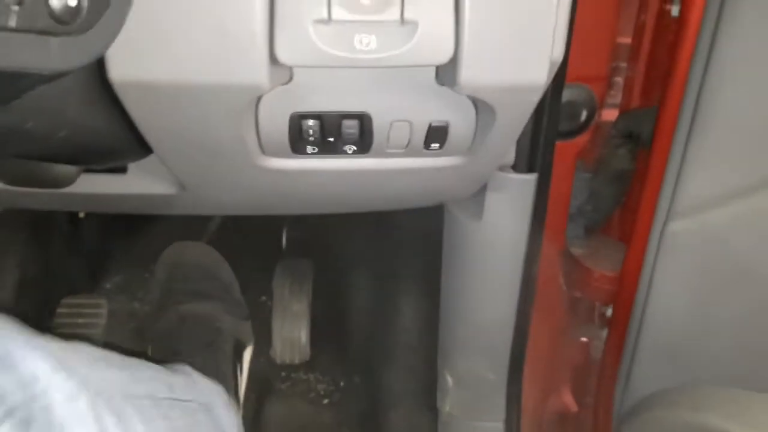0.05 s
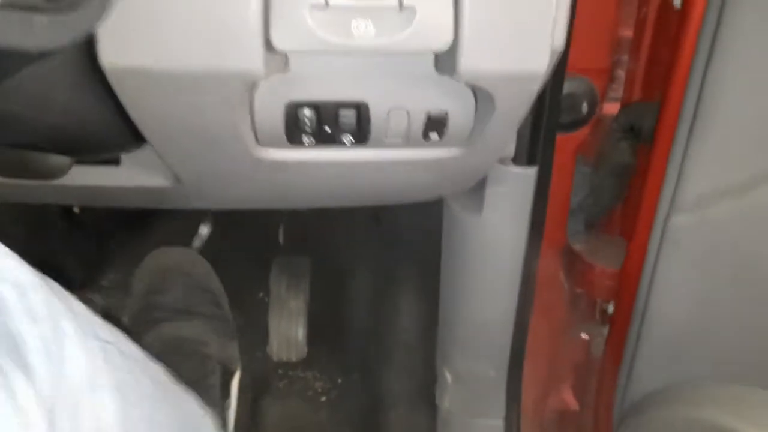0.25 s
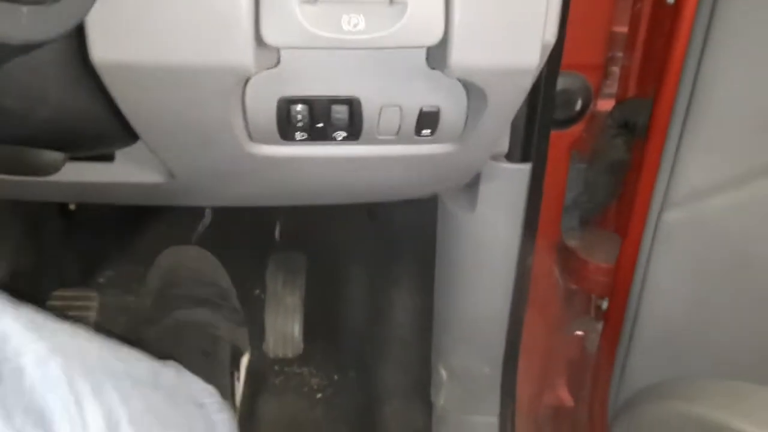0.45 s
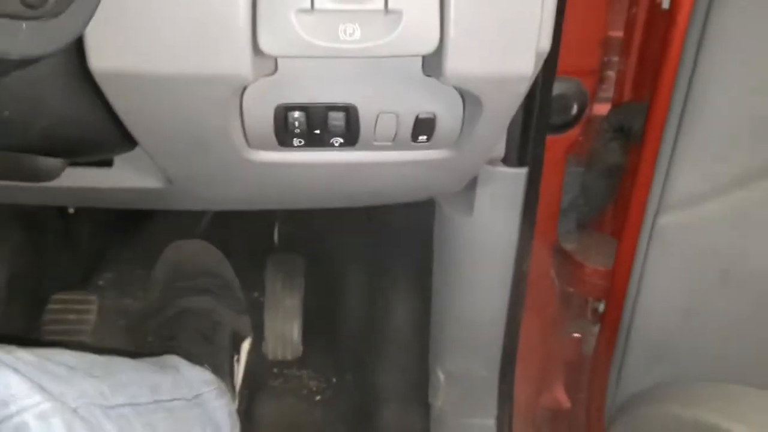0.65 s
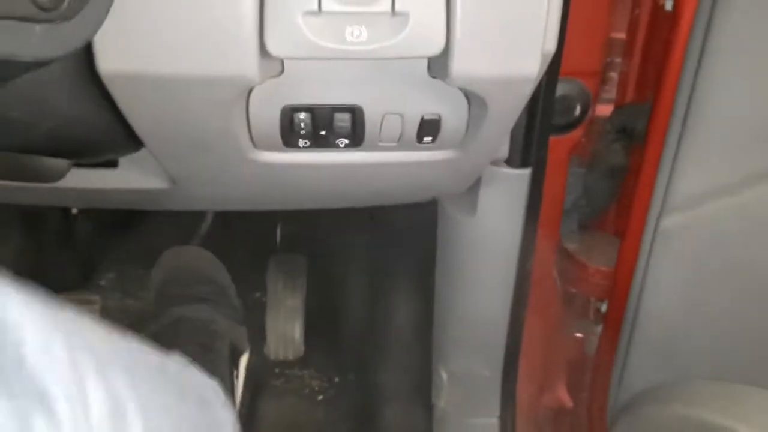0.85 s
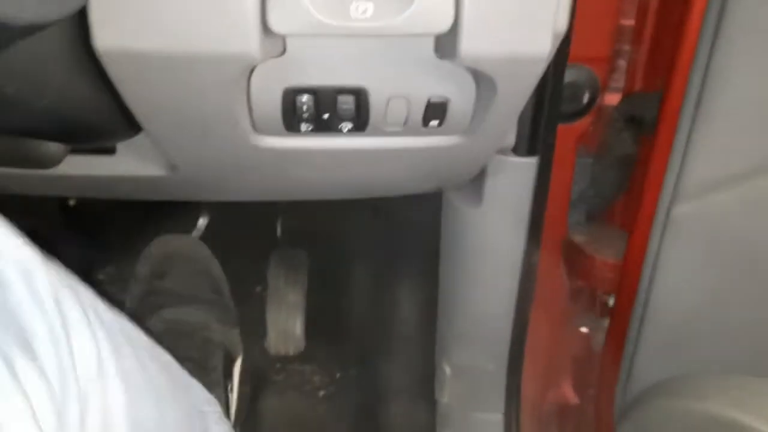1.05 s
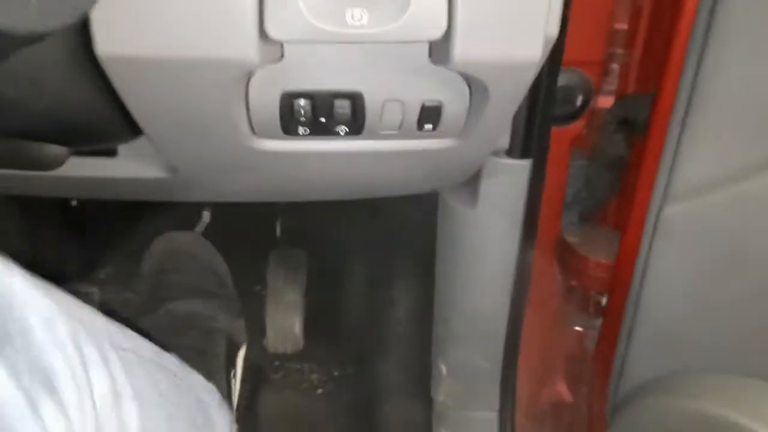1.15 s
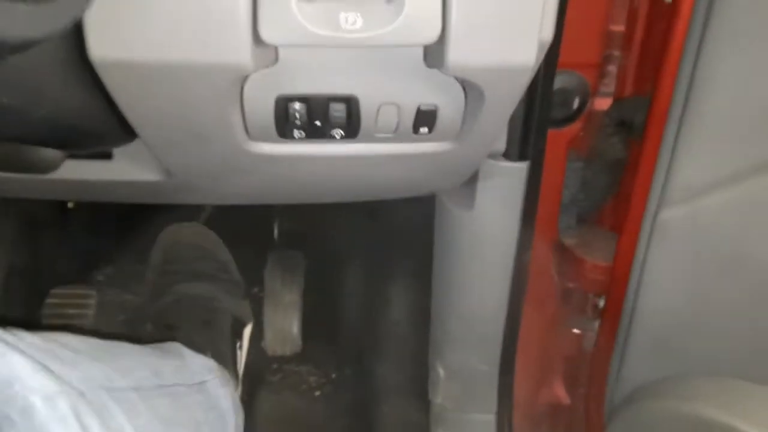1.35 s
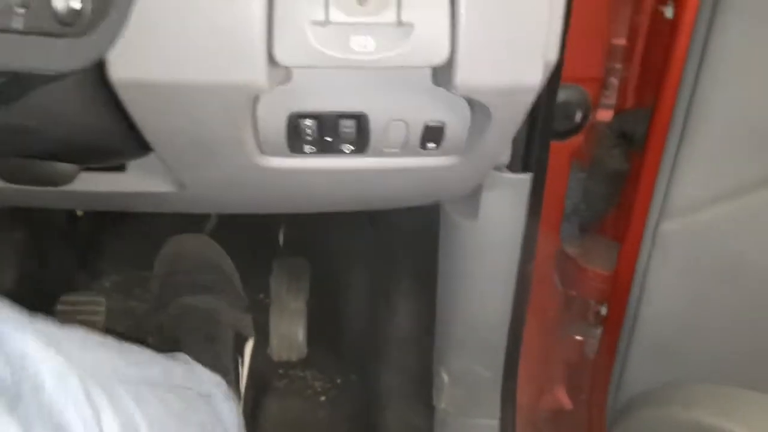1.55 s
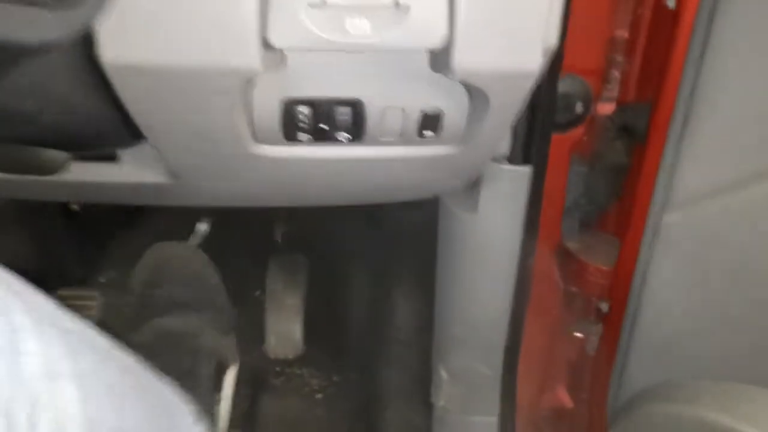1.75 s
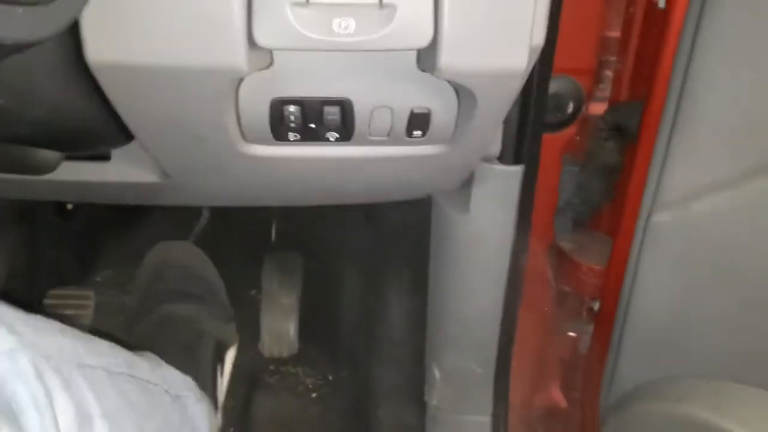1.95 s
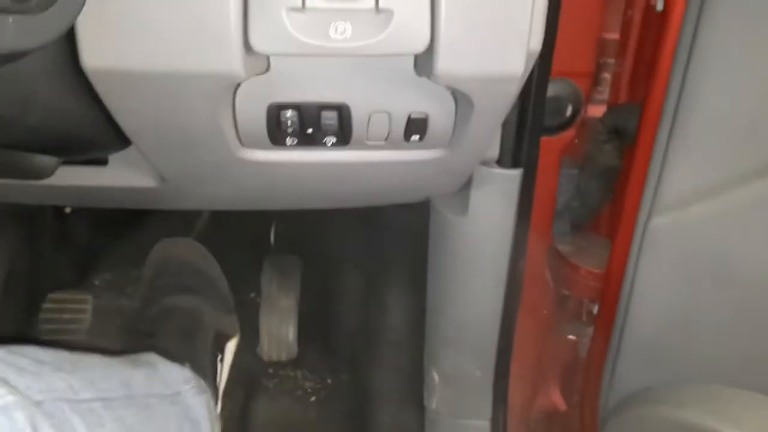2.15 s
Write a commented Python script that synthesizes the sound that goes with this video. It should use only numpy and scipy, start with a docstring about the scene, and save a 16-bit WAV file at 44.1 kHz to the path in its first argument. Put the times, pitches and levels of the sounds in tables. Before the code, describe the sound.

A car brake pedal is pumped three times by foot. From 0.14 to 0.42 seconds, the strongest stroke gives tumbling dull thuds, sharp clacks, panel rattle and a brief spring groan. A softer stroke follows at 0.86-1.16, with tiny clicks near 1.35, then a third at 1.6-1.9. Airy cloth hiss swells with the strokes; faint garage air dips almost to silence between them. Close, dry stereo cabin sound.

```python
"""A car pedal pumped three times by foot, heard from the driver's seat with the door open.
Each stroke jolts the pedal box, floor pan and cabin into dull thuds: damped modes struck by blows and judder.
Trim panels ring along, the return spring groans in wavering tones, linkage and switch tick in noise bursts,
small parts clack in short damped tones. Noise of air and cloth hisses with each stroke over garage air;
between the strokes the background dips almost to silence."""
import sys
import numpy as np
from scipy import signal
from scipy.fft import rfft, irfft
from scipy.io import wavfile
from scipy.ndimage import uniform_filter1d

SR = 44100
rng = np.random.default_rng(int(sys.argv[2]) if len(sys.argv) > 2 else 0)


def volts_from_decibels(level):
    """Turn decibel levels (scalar or array-like) into linear amplitude factors."""
    exponent = np.asarray(level, float) / 20
    return 10 ** exponent


def dump(signal):
    """Clip the signal to [-1, 1] and save it as 16-bit WAV at the path in sys.argv[1]."""
    limited = np.clip(np.atleast_2d(signal).T, -1, 1)
    pcm = np.round(limited * 32767).astype(np.int16)
    wavfile.write(sys.argv[1], SR, pcm)


N = 97020  # 2.2 s


def evened(x):
    """Scales a signal to an rms of 1."""
    return x / np.sqrt(np.mean(x ** 2) + 1e-20)


def read(points, hz):
    """Reads a curve of (Hz, value) points along a log frequency axis."""
    point_hz, value = np.transpose(points)
    return np.interp(np.log(hz + 1), np.log(point_hz + 1), value)


def add(mix, start_s, sound):
    """Lays a sound into the mix from start_s, cut off at the end of the mix."""
    part = mix[..., round(start_s * SR):][..., :sound.shape[-1]]
    part += sound[..., :part.shape[-1]]


def coloured(x, points):
    """Shapes the spectrum by (Hz, dB) points."""
    gain = volts_from_decibels(read(points, np.fft.rfftfreq(x.shape[-1], 1 / SR)))
    return irfft(rfft(x) * gain, x.shape[-1])


# levels over time, of the judder of the moving pedal, and of the background hiss and air with its dips:
# start_s, judder_db, background_db
LEVELS = [(0, -75, -69.5), (.1, -85, -66.5), (.16, -46, -60), (.36, -28, -47), (.46, -53.5, -59),
          (.6, -64, -68.5), (.68, -74.5, -79), (.73, -86, -75.5), (.75, -64.5, -69.5),
          (0.821, -64.5, -64.5), (.9, -40, -58.5), (1.08, -31.5, -59), (1.25, -53, -63), (1.38, -82.5, -65),
          (1.44, -73.5, -76), (1.5, -55.5, -70.5), (1.57, -78, -65.5), (1.66, -37, -58.5),
          (1.86, -42, -52.5), (1.93, -50, -61.5), (2.051, -68.5, -61.5), (2.13, -71, -72),
          (2.2, -84.5, -79.5)]


def level_over_time_db(column):
    """Draws one column of the levels table as a line over time."""
    points = np.transpose(LEVELS)
    return np.interp(np.arange(N) / SR, points[0], points[column])


# colour of the air and cloth noise: pitch_hz, level_db (per Hz, relative)
HISS_COLOUR = [(290, -24.5), (560, -8.5), (1970, -11.5), (4800, -8), (8300, -12.5), (9400, -27),
               (12500, -13.5), (16300, -31.5)]


def hiss():
    """Air and cloth noise, nearly independent at the two ports, swells with each stroke."""
    slow = evened(uniform_filter1d(rng.standard_normal(N), 500))
    flutter_db = 0.34 * slow
    noise = rng.standard_normal((3, N))
    ports = noise[:2] + 0.083 * noise[2]  # the third noise is common to both ports
    return evened(coloured(ports, HISS_COLOUR)) * volts_from_decibels(level_over_time_db(2) + flutter_db)


# colour of the garage air: pitch_hz, level_db (per Hz, relative)
AIR_COLOUR = [(15, -34), (25, -5), (76, -0.5), (202, -17), (1080, -28), (1350, -44), (3030, -45.5),
              (6480, -31), (16300, -43.5)]
AIR_DB, AIR_FULL_DB = -62.5, -72  # full level; background level below which the air sinks with it


def garage_air():
    """Steady noise, mostly common to both ports, that sinks in the dips of the background."""
    noise = rng.standard_normal((3, N))
    ports = noise[:2] + 3 * noise[2]
    sink_db = np.minimum(level_over_time_db(2) - AIR_FULL_DB, 0)
    return evened(coloured(ports, AIR_COLOUR)) * volts_from_decibels(AIR_DB + sink_db)


# modes of the pedal box, floor pan, cabin boom and trim panels, each: pitch_hz, level_db, t60_s
BOX = [(308.7, -2.5, 0.099), (328.8, 7.5, 0.059), (369.6, -12.5, 0.12)]
PAN = [(121.85, 1.5, 0.17), (151.8, 7, 0.1), (172, -6.5, 0.1)]
BOOM = [(57, -6, 0.25), (77.35, 2.5, .16), (100.2, 6, 0.11)]
TRIM = [(463.1, -2, 0.17), (540.3, 3, 0.082), (614, -5, 0.082), (696.2, -5.5, 0.13), (838, -8, 0.19),
        (982, -10, 0.12), (1061, -13.5, 0.09), (1181, -10.5, 0.15), (1322, -11, 0.13), (1468, -17.5, 0.21),
        (1763, -15.5, 0.064), (2040, -10.5, 0.14)]
# how softly each part starts, in the order box, pan, boom, trim: rise_s
RISE_S = [0.0083, 0.0057, 0.0067, 0.002]
# share of the judder in each part, same order: level_db
JUDDER_DB = [-21, -20, -16, -27]
JUDDER_PER_S, JUDDER_SPREAD_DB = 150, 7.5  # mean rate of blows, scale of their random extra level


def ring(modes, rise_s):
    """Response of one part to a soft blow: a sum of damped sines with a peak of 1."""
    t = np.arange(SR // 2) / SR
    x = sum(volts_from_decibels(db - 60 * t / t60) * np.sin(2 * np.pi * hz * t) for hz, db, t60 in modes)
    x = x * (1 - np.exp(-t / rise_s)) ** 2
    return x / abs(x).max()


def judder():
    """Random small blows, stronger as the pedal moves, set the modes of all four parts ringing."""
    out = np.zeros(N)
    level = volts_from_decibels(level_over_time_db(1))
    for modes, rise_s, share_db in zip([BOX, PAN, BOOM, TRIM], RISE_S, JUDDER_DB):
        extra_db = JUDDER_SPREAD_DB * np.minimum(rng.exponential(1, N), 3)
        size = volts_from_decibels(extra_db) * rng.choice([-1, 1], N)
        hits = rng.random(N) < JUDDER_PER_S / SR
        drive = size * hits * level * volts_from_decibels(share_db)
        out += signal.fftconvolve(drive, ring(modes, rise_s))[:N]
    return out


# jolts of the pedal, and one faint late rustle: start_s, box_db, pan_db, boom_db, trim_db
BLOWS = [(0.004, -53.5, -55, -76, -85), (0.136, -34.5, -44, -37.5, -61), (0.164, -42, -25, -53, -44.5),
         (0.2, -17.5, -35, -15, -32.5), (0.208, -25, -14, -17, -32), (0.238, -21, -34, -57.5, -35.5),
         (0.27, -39, -26.5, -47, -39.5), (0.307, -21, -46, -31, -33), (0.319, -16, -13.5, -27, -28.5),
         (0.337, -16, -18.5, -18, -30), (0.359, -29.5, -24, -17, -47), (0.387, -44, -29, -25.5, -47.5),
         (0.423, -47, -38, -52, -48.5), (0.487, -64, -54.5, -36, -82), (0.739, -54, -54, -66.5, -83.5),
         (0.864, -44, -37.5, -63.5, -54.5), (0.886, -28, -26.5, -53, -46.5), (0.907, -64, -33.5, -46, -64),
         (0.934, -19.5, -17.5, -49, -36.5), (0.955, -27.5, -47, -44, -38.5), (0.97, -42, -58, -30.5, -49),
         (1.003, -30, -25, -27.5, -39), (1.032, -25.5, -33, -28, -48), (1.057, -30.5, -25, -33, -67),
         (1.089, -21.5, -20, -35.5, -34), (1.115, -71, -45, -23.5, -52), (1.143, -71, -34, -42, -50),
         (1.16, -39.5, -37.5, -33, -46.5), (1.331, -58, -76, -62, -55.5), (1.469, -60, -48, -55, -82),
         (1.564, -65.5, -52, -54, -82), (1.614, -35, -48, -36, -56), (1.639, -46, -28, -39, -50),
         (1.663, -35, -25.5, -70, -56), (1.69, -25.5, -23.5, -39, -38.5), (1.7, -20, -16.5, -40, -32.5),
         (1.719, -27.5, -21.5, -38, -37), (1.756, -30.5, -33, -28, -46), (1.788, -42, -17.5, -19.5, -47.5),
         (1.8157, -17, -26, -17.5, -31.5), (1.843, -36, -23, -25, -41), (1.872, -39, -31, -46, -49.5),
         (1.912, -53, -43, -41, -63), (1.945, -52, -63, -35, -74), (2.059, -64, -76, -63, -59.5)]


def thuds():
    """Single blows strike the pedal box, floor pan and cabin, which answer with their low modes."""
    out = np.zeros(N)
    for part, modes in enumerate([BOX, PAN, BOOM]):
        drive = np.zeros(N)
        for blow in BLOWS:
            drive[round(blow[0] * SR)] += volts_from_decibels(blow[1 + part])
        out += signal.fftconvolve(drive, ring(modes, RISE_S[part]))[:N]
    return out


TRIM_SCATTER_DB, TRIM_SHIFT = 2, 0.0629  # scatter of level, and of pitch as a share
TRIM_APART_RAD = 0.45  # scatter of the phase turned forward at one port and back at the other


def panels():
    """Every blow sets the trim modes ringing with its own levels, pitches and phases."""
    out, t = np.zeros((2, N)), np.arange(6000) / SR
    hz, db, t60 = np.transpose(TRIM * 5)[:, :, None]  # each mode is a cluster of five
    cluster_gain = np.sqrt(len(TRIM) / len(hz))
    rise = (1 - np.exp(-t / RISE_S[3])) ** 2
    for blow in BLOWS:
        level_z, pitch_z, phase_z, apart_z = rng.standard_normal((4, len(hz), 1))
        level_db = blow[4] + db + TRIM_SCATTER_DB * level_z
        fade = cluster_gain * volts_from_decibels(level_db - 60 * t / t60) * rise
        turn = 2 * np.pi * (hz * (1 + TRIM_SHIFT * pitch_z) * t + phase_z)
        apart = TRIM_APART_RAD * apart_z
        left = (fade * np.sin(turn + apart)).sum(0)
        right = (fade * np.sin(turn - apart)).sum(0)
        add(out, blow[0], np.array([left, right]))
    return out


# the return spring groans as it is loaded and released: start_s, length_s, pitch_hz, level_db
GROANS = [(0.106, 0.13, 326.4, -35), (0.438, 0.23, 275.3, -61), (0.826, 0.087, 335.5, -45),
          (1.171, 0.28, 250.3, -66.5), (1.574, 0.15, 322.2, -38.5), (1.987, 0.12, 268.5, -57.5)]
GROAN_WOBBLE, GROAN_FLUTTER_DB = 0.03, 3  # rms pitch waver as a share, rms level waver
GROAN_OCTAVE_DB, GROAN_SWELL = -24.5, 1.32  # octave under the tone's level, exponent of the arch


def groans():
    """A wavering tone with a weak octave under one arch per groan."""
    out = np.zeros(N)
    noise = rng.standard_normal((2, N))
    slow = evened(uniform_filter1d(uniform_filter1d(noise, 300), 300))
    for start_s, length_s, hz, db in GROANS:
        level_waver, pitch_waver = slow[:, round(start_s * SR):][:, :round(length_s * SR)]
        progress = np.linspace(0, 1, len(level_waver))
        arch = np.sin(np.pi * progress ** 0.92).clip(0) ** GROAN_SWELL
        turn = 2 * np.pi * np.cumsum(hz * (1 + GROAN_WOBBLE * pitch_waver)) / SR
        tone = np.sin(turn) + volts_from_decibels(GROAN_OCTAVE_DB) * np.sin(2 * turn)
        add(out, start_s, arch * volts_from_decibels(db + GROAN_FLUTTER_DB * level_waver) * tone)
    return out


# ticks of linkage and switch: start_s, level_db, centre_hz, low_db (lows' lift), high_db (highs' lift)
TICKS = [(0.138, -41.5, 4150, -18, -15), (0.157, -33.5, 4300, -13.5, -15.5), (0.2022, -24, 5730, -5, -7.5),
         (0.2391, -31.5, 4300, 0.5, -2), (0.308, -23.5, 2930, -3.5, -38.5), (0.338, -26, 4090, 5, -49),
         (0.3877, -36, 3900, 0, -12), (0.865, -41.5, 4300, -8, -15), (0.8832, -34, 4400, -10, -13.5),
         (0.9334, -36, 4160, 9.5, -20), (0.9423, -32, 6160, 5, -4), (0.9752, -31.5, 6460, 4, -18.5),
         (1.044, -40.5, 4180, 7.5, -48), (1.0909, -33, 2300, 5.5, -52), (1.1593, -39, 3700, -4, -11.5),
         (1.6147, -44, 4440, -26.5, -15), (1.6378, -36, 4430, -7.5, -17.5), (1.7, -29.5, 6900, -4, -7),
         (1.7274, -33.5, 6350, -4, -27), (1.737, -36, 6600, -7, -8.5), (1.7883, -39, 4400, -3, -35),
         (1.8159, -28, 2300, 8, -46), (1.8758, -39.5, 7800, -4, -13.5)]
# colour shared by all ticks: pitch_hz, level_db
TICK_COLOUR = [(600, -19), (1500, 4), (2900, 0.5), (4300, 0), (5500, -3.5), (8300, -2.5), (9300, -5),
               (13000, 2), (16000, -14)]
# likeness of the ticks at both ports: pitch_hz, likeness (0-1)
TICK_LIKENESS = [(400, 0.9), (1500, 0), (4000, 0.55), (12000, 0)]
TICK_RISE_S, TICK_T60_S = 0.0028, 0.042
TAIL_DB, TAIL_T60_S = -17.5, 0.27  # cabin tail
PEAK_DB = 7  # lift around each tick's centre
GRAIN_DB, GRAIN_S = 4, 0.0015  # the body of a tick is a rattle of tiny contacts


def ticks():
    """Bursts of coloured noise, each with a short rattling body and a cabin tail."""
    out, t = np.zeros((2, N)), np.arange(8192) / SR
    hz = np.fft.rfftfreq(len(t), 1 / SR)
    same = np.clip(read(TICK_LIKENESS, hz), 0, 1)
    rise = 1 - np.exp(-t / TICK_RISE_S)
    body = rise * volts_from_decibels(-60 * t / TICK_T60_S)
    tail = rise * volts_from_decibels(TAIL_DB - 60 * t / TAIL_T60_S)
    for start_s, db, centre_hz, low_db, high_db in TICKS:
        tone_db = read(TICK_COLOUR, hz)
        tone_db += read([(1800, low_db), (2600, 0), (8500, 0), (9500, high_db)], hz)
        tone_db += PEAK_DB * np.exp(-(np.log((hz + 1) / centre_hz) / 0.17) ** 2)
        left, other = rfft(rng.standard_normal((2, len(t))))
        right = same * left + np.sqrt(1 - same ** 2) * other
        noise = evened(irfft(np.array([left, right]) * volts_from_decibels(tone_db)))
        contacts = uniform_filter1d(rng.standard_normal(len(t)), round(GRAIN_S * SR))
        grain = evened(volts_from_decibels(GRAIN_DB * evened(contacts)))
        add(out, start_s, volts_from_decibels(db) * noise * (body * grain + tail))
    return out


# short hard clacks of small metal and plastic parts: start_s, level_db, pitch_hz, t60_s
CLACKS = [(.204, -29.5, 674, 0.3), (0.203, -27.5, 519, 0.17), (0.312, -29, 496, 0.073),
          (.338, -27, 921, 0.092), (0.937, -29.5, 585, 0.19), (1.692, -30, 567, 0.11),
          (1.816, -28.5, 1042, 0.083), (0.2037, -33.5, 5950, 0.022), (0.3094, -20, 3013, 0.025),
          (.3385, -25, 4040, 0.023), (1.0911, -25.5, 4100, 0.014), (1.0904, -30.5, 1078, 0.087),
          (1.33, -42.5, 880, 0.017), (1.37, -51, 1940, .015), (1.39, -39.5, 2290, 0.012),
          (1.391, -48, 3750, 0.01), (1.82, -25.5, 4170, 0.018), (1.818, -37, 2330, 0.02)]
CLACK_RISE_S, CLACK_SPREAD_HZ = 0.0005, 45  # start, mean spacing of the three tones
CLACK_APART_S = 0.00004  # time scatter of each tone at each port


def clacks():
    """Each clack rings three close damped tones, slightly scattered in time between the ports."""
    out, t = np.zeros((2, N)), np.arange(8192) / SR
    rise = 1 - np.exp(-t / CLACK_RISE_S)
    for start_s, db, centre_hz, t60 in CLACKS:
        z = rng.standard_normal((3, 3, 1))
        tones_hz = centre_hz + CLACK_SPREAD_HZ * (np.array([[-1], [0], [1]]) + 0.5 * z[0])
        rings = np.sin(2 * np.pi * tones_hz * (t + CLACK_APART_S * z[1:])).mean(1)  # (port, time)
        add(out, start_s, rise * volts_from_decibels(db - 60 * t / t60) * rings)
    return out


# balance of the two ports: pitch_hz, left_minus_right_db
LEAN = [(60, 2), (130, 1.5), (290, 3), (640, 1.5), (1410, 0), (3100, -6), (6820, -7.5), (15000, 6)]
LAG_S = 0.00019  # left leads


def scene():
    """Pedal sounds over the garage air, tilted in level and time between two microphone ports."""
    mix = hiss() + garage_air() + judder() + thuds() + panels() + groans() + ticks() + clacks()
    hz = np.fft.rfftfreq(N, 1 / SR)
    lean_db = read(LEAN, hz)
    balance = volts_from_decibels([lean_db / 2, -lean_db / 2])
    delay = np.exp([0 * hz, -2j * np.pi * hz * LAG_S])
    return irfft(rfft(mix) * balance * delay, N)


def top_cut(x):
    """Nothing passes above the cut-off."""
    return signal.sosfilt(signal.butter(12, 16460, fs=SR, output="sos"), x)


def record(dry):
    """Band limit at the top, then the bass roll-off of the microphone."""
    low_pass = signal.firwin(511, 16180, window=("kaiser", 9), fs=SR)
    limited = signal.oaconvolve(dry, low_pass[None], "same")
    finished = signal.lfilter(*signal.butter(4, 58.6, "high", fs=SR), limited)
    return top_cut(finished)


dry = scene()
out = record(dry)
dump(out)
```